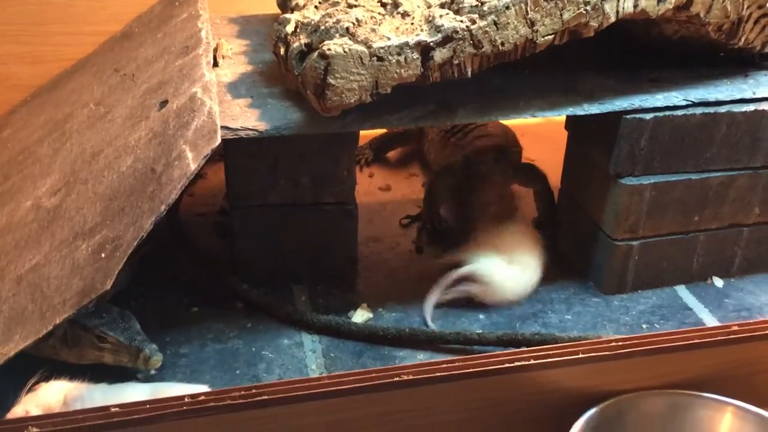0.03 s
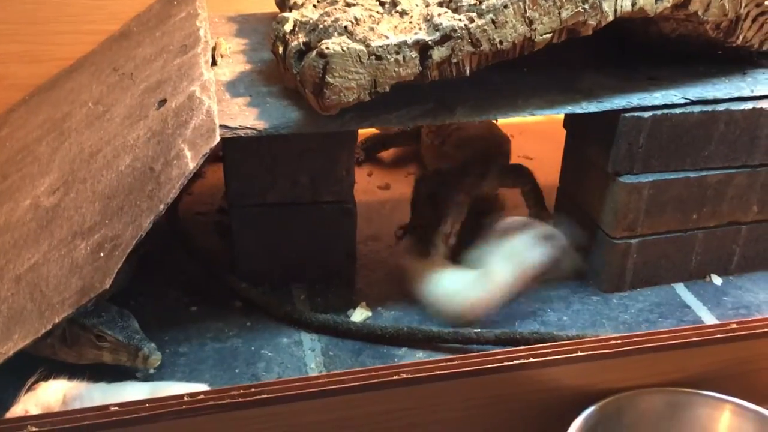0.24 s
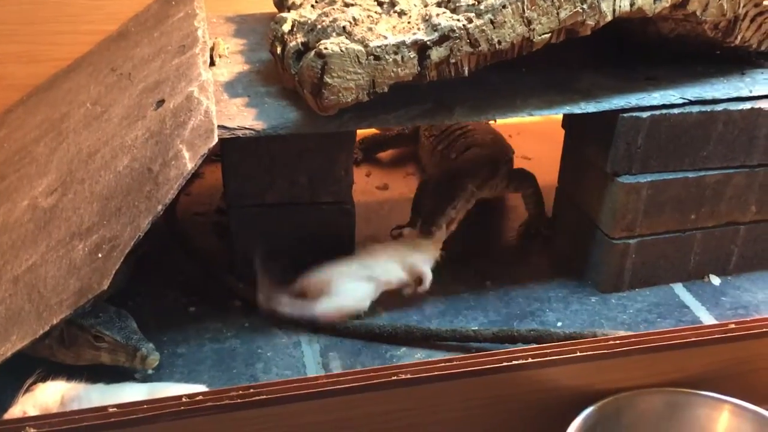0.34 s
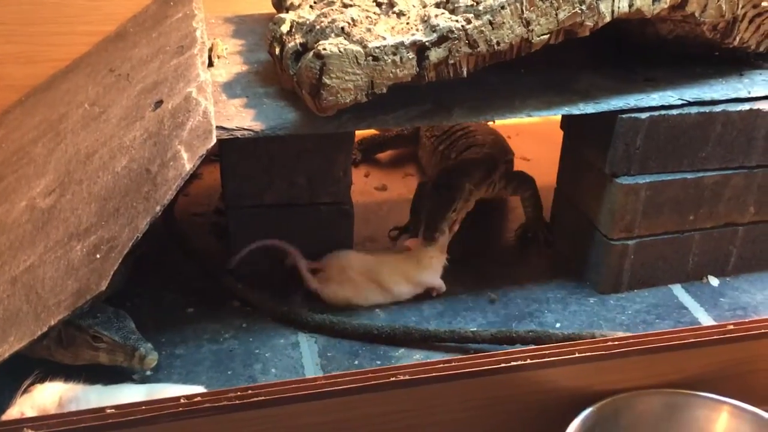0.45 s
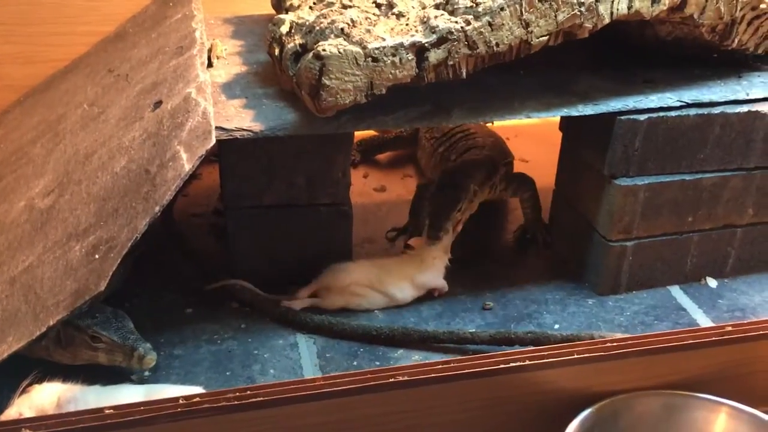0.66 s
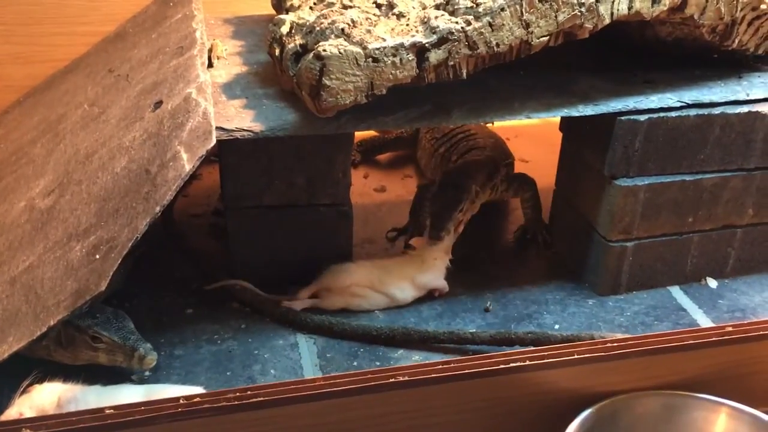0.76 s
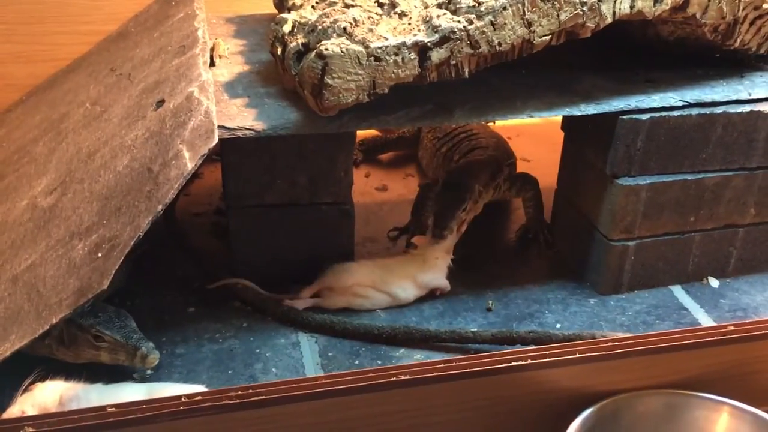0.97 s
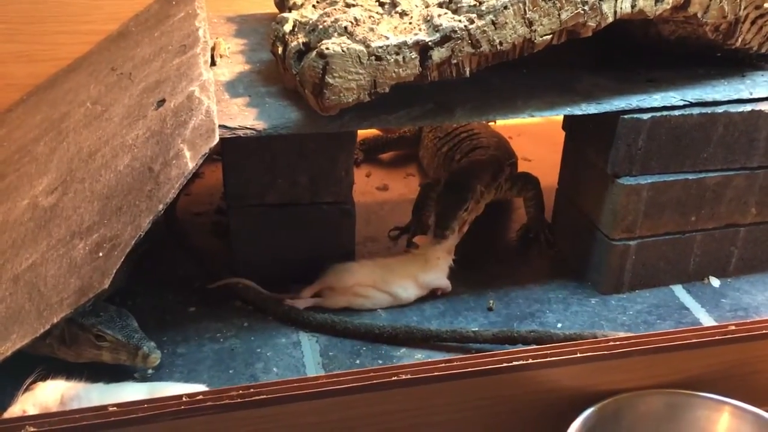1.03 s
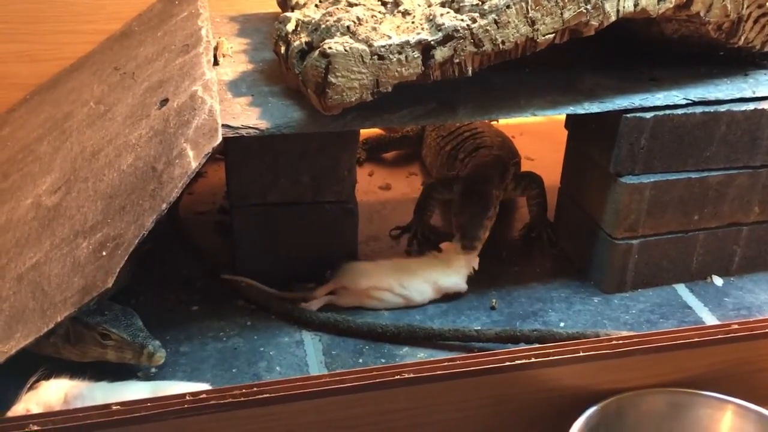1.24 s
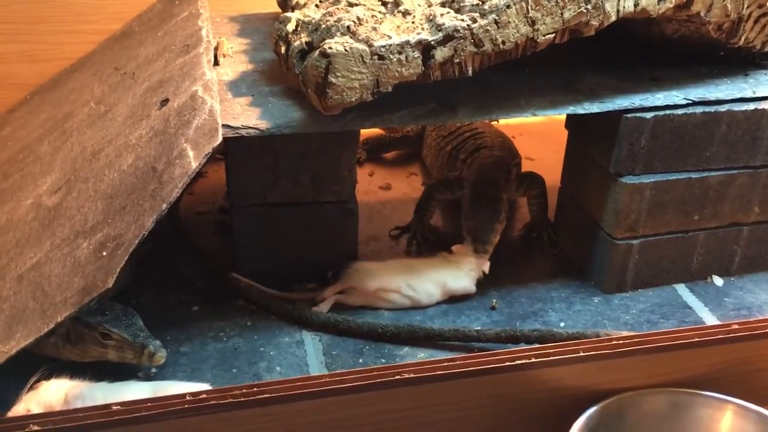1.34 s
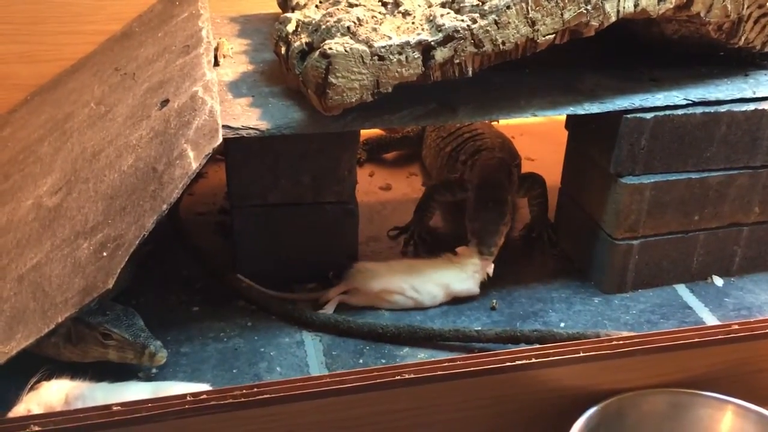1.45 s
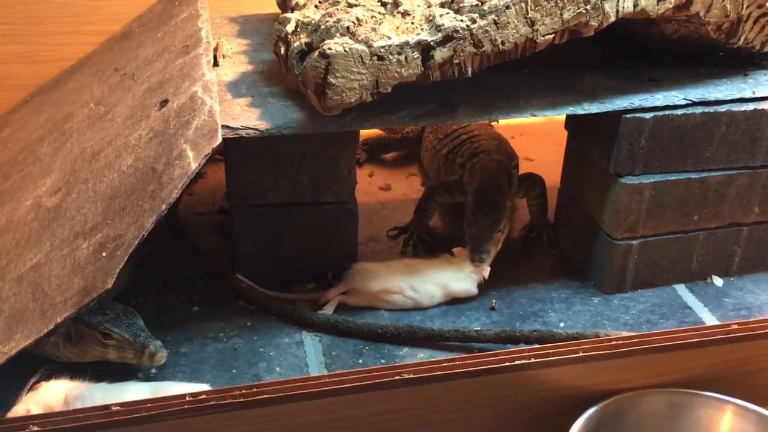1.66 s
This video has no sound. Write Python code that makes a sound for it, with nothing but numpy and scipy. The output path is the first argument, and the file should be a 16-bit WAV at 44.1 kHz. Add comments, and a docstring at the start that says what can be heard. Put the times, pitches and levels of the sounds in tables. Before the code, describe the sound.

A quick flurry of hard clacks and dull thumps as a lizard beats a limp animal against slate, fur and claws scuffing between. Grit ticks sharply, then a faint drag follows over quiet hum, heard close in an indoor enclosure.

```python
"""A soft thud, then a flurry of clacks: a lizard shakes a small limp animal and knocks it against the
slate floor and blocks of a wooden enclosure. Hard blows set the slate ringing, the body lands with dull
booms, and fur and claws scuff in between. Grit ticks sharply as the flurry ends, and the room rings for
half a second. One tiny tick and a soft drag follow, over faint hiss, rumble, hum and mains buzz."""
import sys
import numpy as np
from scipy import signal
from scipy.fft import rfft, irfft, next_fast_len
from scipy.io import wavfile

SR = 44100
rng = np.random.default_rng(int(sys.argv[2]) if len(sys.argv) > 2 else 0)


def int16_out(signal):
    """Quantize to a 16-bit WAV file."""
    q = np.round(np.clip(np.atleast_2d(signal).T, -1, 1) * 32767)
    wavfile.write(sys.argv[1], SR, q.astype(np.int16))


N = 74970
T = np.arange(N) / SR

# tone of the room's hiss: f/Hz, level/dB
HISS_EQ = [(60, -15.5), (120, -7.5), (185, -1), (270, -10.5), (390, -11), (520, -17), (1100, -17),
           (1700, -22), (3000, -28), (5000, -30.5), (9000, -31), (15500, -35.5)]
# tone of the room's rumble: f/Hz, level/dB
RUMBLE_EQ = [(20, -39.5), (36, -19), (48, -1), (80, 3), (120, -8), (250, -23.5), (1000, -92)]
# partials of the machine hum: f/Hz, level/dB
HUM_PARTIALS = [(48.4, -60.5), (75.4, -65), (90, -67), (177.6, -79.5), (393, -80), (592.2, -80)]
# whines of the mains buzz: f/Hz, level/dB, t/s of one swell
BUZZ_PARTIALS = [(5497, -88, .018), (5647, -89, .018), (13890, -90, .006), (14190, -86, .006)]
# tone of the reverb tail: f/Hz, level/dB
TAIL_EQ = [(80, -15), (250, -7), (600, 0), (1200, -6.5), (2500, -4), (5000, -12), (9000, -13), (15000, -14)]
# length of the reverb tail: f/Hz, t60/s
TAIL_DECAY = [(80, .45), (500, .56), (1200, 0.55), (2500, .52), (5000, 0.46), (9000, .32), (15000, .26)]
# tone of sliding fur: f/Hz, level/dB
DRAG_EQ = [(150, -13), (500, -8), (1100, -2.5), (2300, -1), (4000, -6.5), (6500, -7.5), (10000, -12),
           (15500, -9.5)]
# fader ride of the scuffing: t/s, level/dB
SCUFF_FADER = [(0, -72.5), (.07, -64), (.125, -61.5), (.145, -53.5), (.17, -53.5), (.22, -45.5), (.29, -45),
               (.34, -38.5), (.40, -48.5), (.47, -48.5), (.51, -52), (.58, -53.5), (.68, -76.5)]
# tone of the scuffing: f/Hz, level/dB
SCUFF_EQ = [(100, 1.5), (300, 5), (600, -5), (1100, -0.5), (2400, -8), (4000, -13), (7000, -17),
            (15500, -26)]
# claw and grit contacts: t/s, click level/dB, spray level/dB
TICK_CUES = [(0.411, -28.5, -43.5), (0.508, -55, -59), (0.5506, -15.5, -36), (1.147, -52, -73)]
# tone of those contacts: f/Hz, level/dB
TICK_EQ = [(300, -23), (1000, -4), (2300, -0.5), (5400, -4.5), (6300, 2), (9000, -3.5), (13500, -1.5),
           (15800, -10.5)]
# landings of the soft body: t/s, boom level/dB, f/Hz, t60/s, slap level/dB
THUD_CUES = [(0.042, -40.5, 78.4, 0.064, -52.5), (0.173, -48.5, 155, .12, -63),
             (.238, -34.5, 168, 0.1, -31), (0.307, -36, 159, .1, -30), (0.328, -35, 72, 0.31, -35),
             (0.343, -34, 88, 0.21, -37.5), (0.42, -32.5, 104, .12, -31.5), (0.45, -34.5, 95, 0.063, -35.5),
             (0.461, -34.5, 173, 0.065, -44.5)]
# tone of the body's slap: f/Hz, level/dB
SLAP_EQ = [(40, -26.5), (90, -6), (150, -8), (290, -0.5), (520, -15.5), (900, -27.5), (2500, -45),
           (16000, -54.5)]
# blows on the slate: t/s, clack level/dB, f/Hz, t60/cycles, crack level/dB, ring re clack/dB
KNOCK_CUES = [(.0395, -39, 651, 1.9, -60, -14.5), (0.1771, -24.5, 2200, 8, -45, -9),
              (.1805, -27, 1070, 8.5, -54, -9), (.2030, -24.5, 1030, 15, -67, -12.5),
              (.2075, -26, 1010, 32, -57.5, -13), (0.2363, -16.5, 2880, 12.7, -23, -7),
              (.2430, -15, 1768, 13, -29, -6.5), (0.2557, -30, 2160, 7, -36.5, -6),
              (0.3077, -14, 2640, 11, -13, -5), (.3170, -15, 1160, 11, -21, -7),
              (.4193, -8.5, 4050, 9, -27, -16), (.4200, -8, 2370, 11.4, -31.5, -7.5),
              (0.4225, -8.5, 1313, 13.3, -24.5, -6), (.4272, -16, 1563, 5.6, -37.5, -1.5)]
# modes of the slate slab: f/Hz, relative level/dB, t60/s
SLAB_MODES = [(705, -29, .09), (921, -12, 0.041), (1049.6, -15, 0.11), (1110.5, -20.5, .13),
              (1184.7, -15.5, 0.094), (1234, -16.5, 0.052), (1410, -18, 0.055), (1733, -6.5, 0.043),
              (2292, -18.5, 0.16), (2459, -10, 0.042), (3460, -22, 0.027), (4560, -26, .025),
              (5540, -16.5, 0.026)]
# tone of the crack on each blow: f/Hz, level/dB
CRACK_EQ = [(300, -12), (1000, -6), (2200, 1), (3500, 0.5), (5500, -12.5), (8500, -11), (11000, -21.5),
            (16000, -21.5)]


def from_db(db):
    """Decibels to gain."""
    return 10 ** (np.asarray(db) / 20)


def unit_rms(x):
    """Scale to unit rms."""
    return x / np.sqrt(np.mean(x ** 2) + 1e-30)


def at_hz(curve, hz):
    """Read a curve on a log-frequency axis."""
    freqs, values = np.transpose(curve)
    return np.interp(np.log(np.maximum(hz, 1)), np.log(freqs), values)


def equalise(x, curve):
    """Minimum-phase EQ of unit energy: nothing rings ahead of an attack."""
    size = next_fast_len(2 * N)
    gains = from_db(at_hz(curve, np.fft.rfftfreq(size, 1 / SR)))
    cepstrum = irfft(np.log(gains), size)
    cepstrum[1:size // 2] *= 2
    cepstrum[size // 2 + 1:] = 0
    response = np.exp(rfft(cepstrum))
    response /= np.sqrt(np.mean(abs(response) ** 2))
    return irfft(rfft(x, size) * response, size)[:N]


def noise_bed(curve, db):
    """Steady noise with the given tone and rms level."""
    return from_db(db) * unit_rms(equalise(rng.standard_normal(N), curve))


def decay(start, t60):
    """Envelope that opens at once and falls 60 dB in t60 seconds."""
    return (T >= start) * from_db(np.maximum(-60 * abs(T - start) / t60, -300))


def ping(start, hz, t60):
    """A damped sine."""
    return decay(start, t60) * np.sin(2 * np.pi * hz * (T - start))


def spray(start, db, t60):
    """A dying spray of tiny contacts."""
    return from_db(db) * decay(start, t60) * rng.choice([-.5, .5], N)


def drift(per_s):
    """Slow random wander, roughly between -1 and 1."""
    knots = rng.standard_normal(int(T[-1] * per_s) + 2)
    return np.interp(T * per_s, np.arange(len(knots)), knots)


def room_tone():
    """Faint airy hiss over a low rumble."""
    return noise_bed(HISS_EQ, db=-66.5) + noise_bed(RUMBLE_EQ, db=-64.5)


def machine_hum(waver_db=2):
    """A machine's low partials, each wavering in level on its own."""
    hum = np.zeros(N)
    for hz, db in HUM_PARTIALS:
        gain = from_db(db + waver_db * drift(per_s=12))
        hum += gain * unit_rms(np.sin(2 * np.pi * (hz * T + rng.random())))
    return hum


def mains_buzz(mains_hz=50, sharpness=1.3):
    """Thin electrical whines that swell once per mains cycle."""
    buzz = np.zeros(N)
    for hz, db, crest in BUZZ_PARTIALS:
        swell = np.exp(sharpness * np.cos(2 * np.pi * mains_hz * (T - crest)))
        buzz += from_db(db) * unit_rms(swell * np.sin(2 * np.pi * hz * T))
    return buzz


def reverb_impulse(build_s=.008, early_db=-5, early_low_cut_hz=414):
    """Quick reflections in the enclosure, then the room's tail, dying band by band."""
    edges_hz = np.geomspace(50, 17000, 13)
    white = rng.standard_normal((2, N))  # neighbouring bands get independent noise
    tail = np.zeros(N)
    for k, (low, high) in enumerate(zip(edges_hz, edges_hz[1:])):
        hz = np.sqrt(low * high)
        band = signal.sosfilt(signal.butter(2, [low, high], "band", fs=SR, output="sos"), white[k % 2])
        envelope = decay(0, at_hz(TAIL_DECAY, hz)) * (1 - np.exp(-T / build_s))
        tail += from_db(at_hz(TAIL_EQ, hz)) * band * unit_rms(envelope)
    early = from_db(early_db) * unit_rms(decay(start=.002, t60=.08) * rng.standard_normal(N))
    early = signal.sosfilt(signal.butter(2, early_low_cut_hz, "high", fs=SR, output="sos"), early)
    return (tail + early) / np.sqrt(N)


def fur_drag(centre_s=1.357, half_width_s=.17):
    """The prey's fur slides over the floor in one faint swell."""
    swell = np.exp(-((T - centre_s) / half_width_s) ** 2)
    return swell * noise_bed(DRAG_EQ, db=-73)


def scuffing(grains_per_s=4000, spread_db=4.5, rub_gain=.53):
    """Fur and claws scrape over the slate: grains on top of a smooth rub."""
    sizes = from_db(spread_db * np.minimum(rng.exponential(1, N), 4))
    signs = rng.choice([-1, 1], N)
    catches = rng.random(N) < grains_per_s / SR
    friction = unit_rms(sizes * signs * catches) + rub_gain * rng.standard_normal(N)
    fader = from_db(np.interp(T, *np.transpose(SCUFF_FADER)))
    return fader * unit_rms(equalise(friction, SCUFF_EQ))


def grit_ticks():
    """Claws and grit make small hard contacts: a bright click and a short spray."""
    contacts = np.zeros(N)
    for start, click_db, spray_db in TICK_CUES:
        click = from_db(click_db) * np.sinc((T - start) * SR)
        contacts += click + spray(start, spray_db, t60=.0063)
    return equalise(contacts, TICK_EQ)


def body_thuds():
    """The limp body booms on the floor with a dull slap."""
    booms, slaps = np.zeros((2, N))
    for start, db, hz, t60, slap_db in THUD_CUES:
        booms += from_db(db) * ping(start, hz, t60)
        slaps += spray(start, slap_db, t60=.079)
    return booms + equalise(slaps, SLAP_EQ)


def slate_knocks():
    """Each blow is a short clack with a crack on top, and sets the slab ringing."""
    clacks, ring, cracks = np.zeros((3, N))
    for start, db, contact_hz, cycles, crack_db, ring_db in KNOCK_CUES:
        clacks += from_db(db) * ping(start, contact_hz, cycles / contact_hz)
        for k, (hz, mode_db, t60) in enumerate(SLAB_MODES):
            rolloff = 1 / np.sqrt(1 + (hz / contact_hz) ** 4)  # modes above the clack get less drive
            ring += (-1) ** k * rolloff * from_db(db + ring_db + mode_db) * ping(start, hz, t60)
        cracks += spray(start, crack_db, t60=.022)
    return clacks + ring + equalise(cracks, CRACK_EQ)


def scene(grit_send_db=10.5):
    """Mono mix: the struggle and grit feed the reverb; the drag and background stay dry."""
    struggle = slate_knocks() + body_thuds() + scuffing()
    grit = grit_ticks()
    send = struggle + from_db(grit_send_db) * grit
    wet = signal.fftconvolve(send, reverb_impulse())[:N]
    return (struggle + grit + wet + fur_drag() + room_tone() + machine_hum() + mains_buzz())[None]


def record(dry, low_cut_hz=40, high_cut_hz=15900):
    """Steep master filters trim the deepest bass and the very top."""
    trimmed = signal.sosfilt(signal.butter(6, low_cut_hz, "high", fs=SR, output="sos"), dry)
    return signal.sosfilt(signal.ellip(10, .2, 70, high_cut_hz, fs=SR, output="sos"), trimmed)


dry = scene()
out = record(dry)
int16_out(out)
```